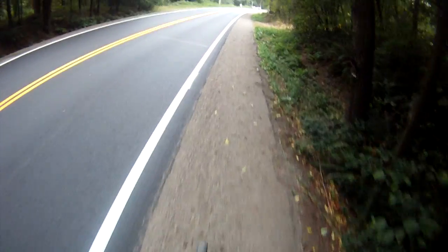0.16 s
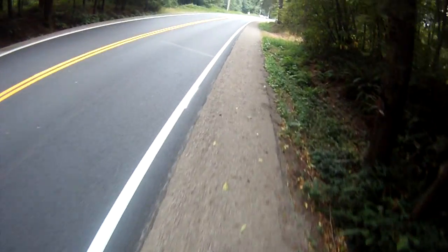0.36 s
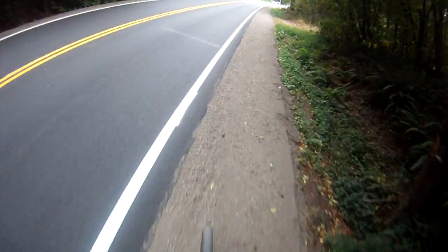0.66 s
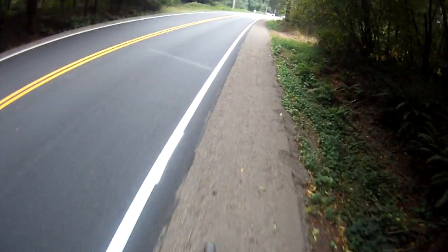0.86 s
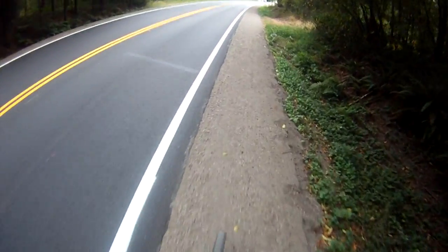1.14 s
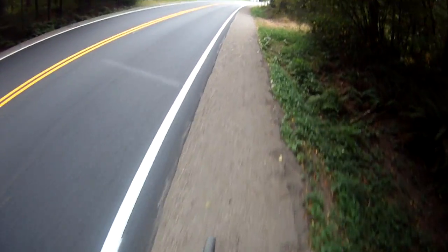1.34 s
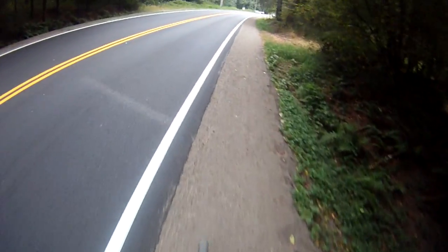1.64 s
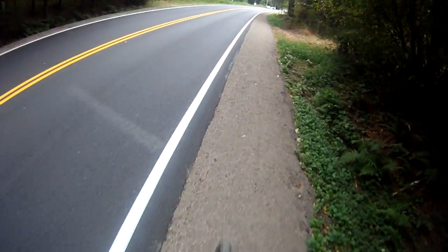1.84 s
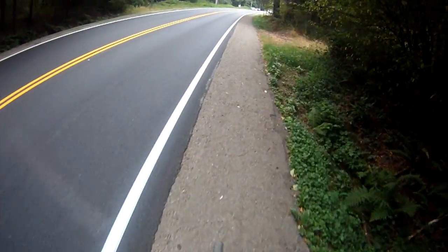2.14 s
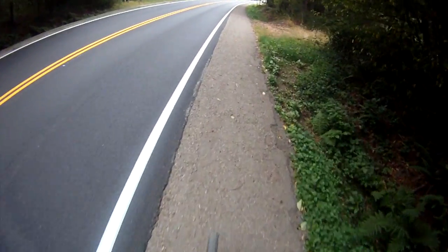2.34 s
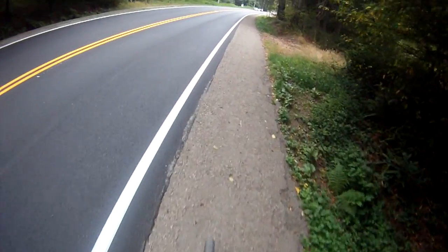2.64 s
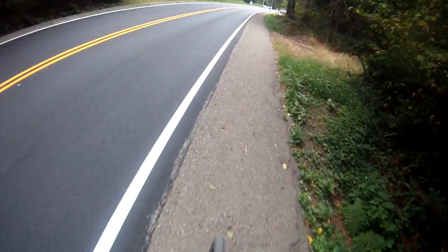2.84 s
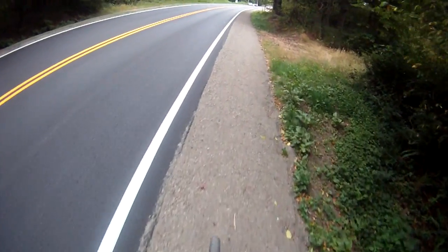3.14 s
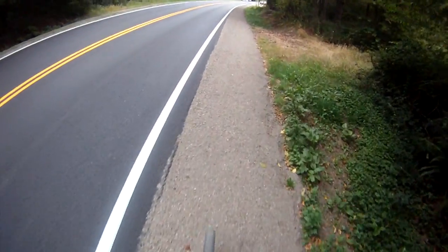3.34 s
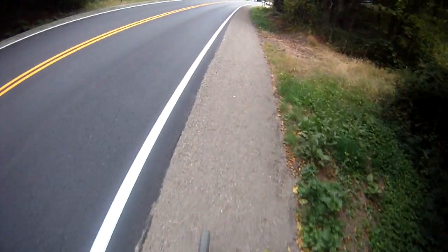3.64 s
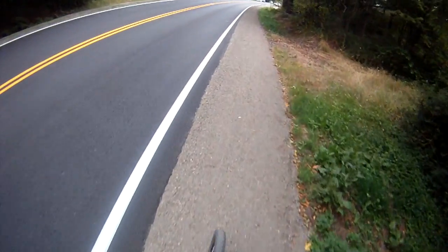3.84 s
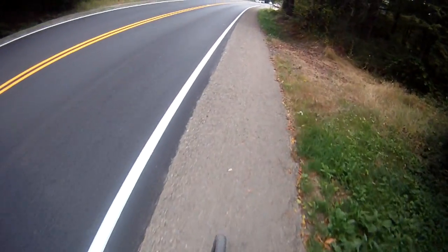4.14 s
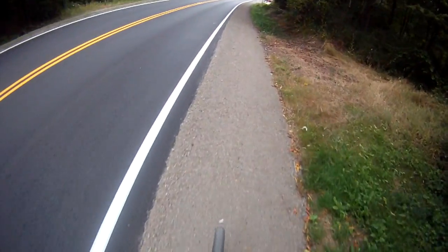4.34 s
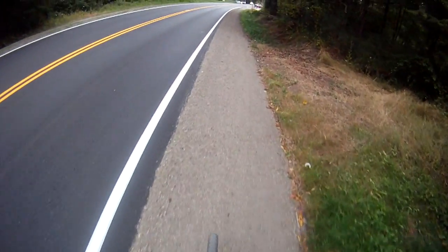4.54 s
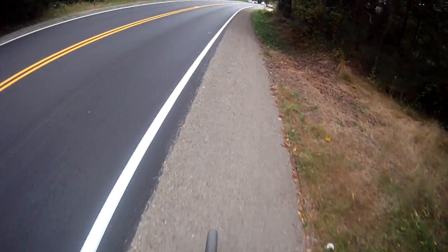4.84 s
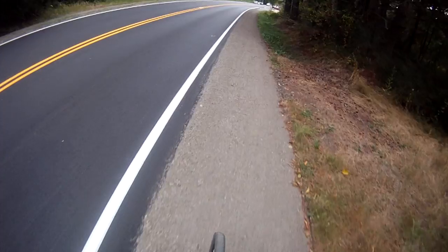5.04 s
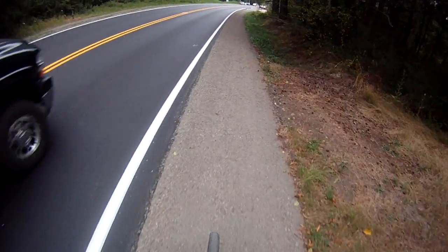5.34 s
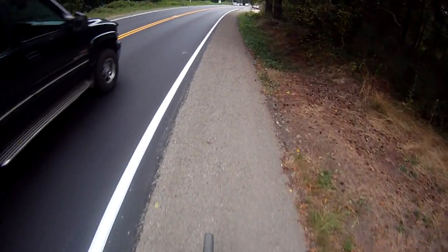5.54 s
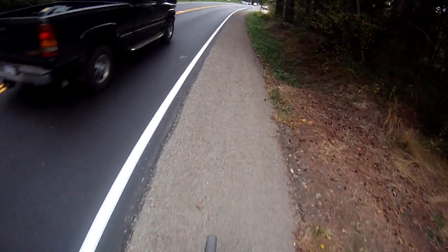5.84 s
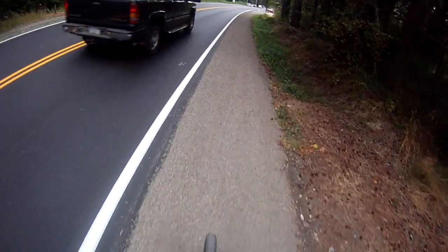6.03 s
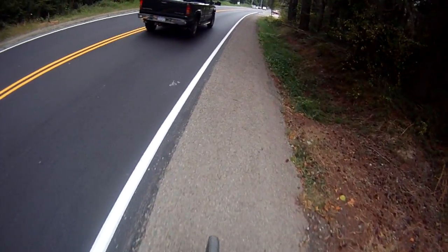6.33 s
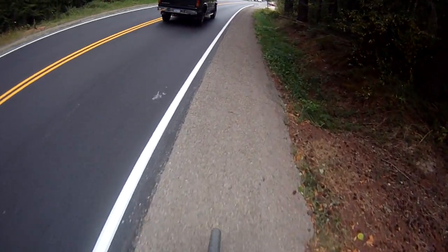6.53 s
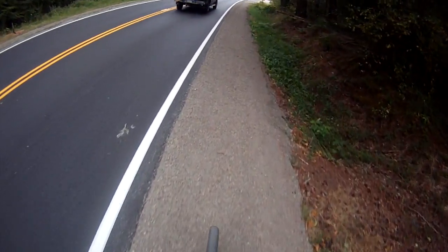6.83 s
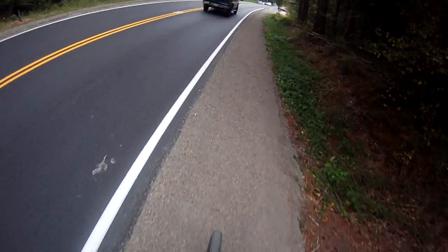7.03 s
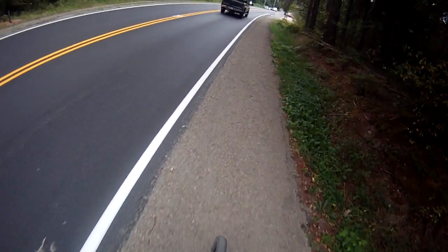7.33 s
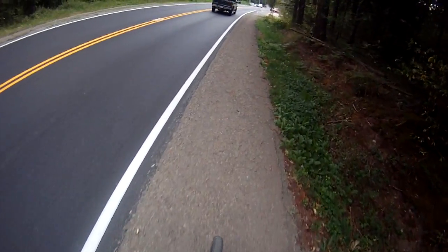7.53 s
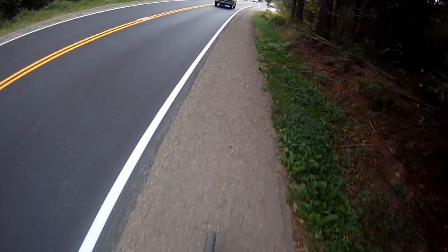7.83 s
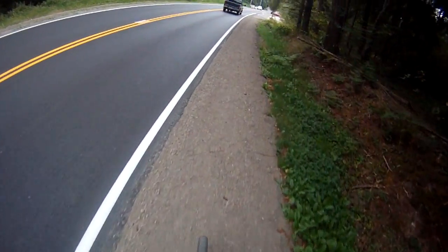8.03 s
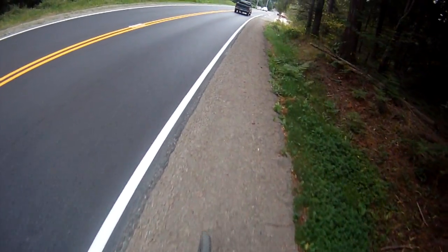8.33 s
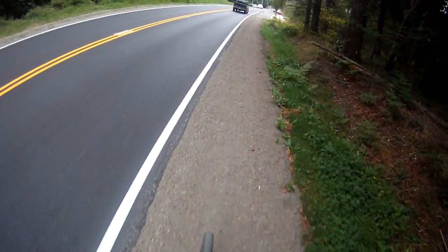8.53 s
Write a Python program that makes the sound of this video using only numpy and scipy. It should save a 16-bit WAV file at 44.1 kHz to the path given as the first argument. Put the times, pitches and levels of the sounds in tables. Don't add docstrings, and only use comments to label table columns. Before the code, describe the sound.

Dull, boxy sound from a bike-mounted camera outdoors: lumpy wind rumble, sparse bright clicks of stones and soft knocks, with a faint rim scrape near the start. After a distant engine dies away, a heavy vehicle approaches and overtakes with a rush of tyres. Its uneven deep drone then stands out and slowly sinks while wind and a few clicks continue.

```python
import sys
import numpy as np
from scipy import signal
from scipy.fft import rfft, irfft, next_fast_len
from scipy.io import wavfile
from scipy.ndimage import uniform_filter1d, map_coordinates

SR = 44100
rng = np.random.default_rng(int(sys.argv[2]) if len(sys.argv) > 2 else 0)


def output_pcm(signal):
    pcm = np.clip(np.atleast_2d(signal).T, -1, 1) * 32767
    wavfile.write(sys.argv[1], SR, np.round(pcm).astype(np.int16))


def convert_level_to_amplitude(level_db):
    exponent = np.asarray(level_db, float) / 20
    return 10 ** exponent


N = 382782
TIME_S = np.arange(N) / SR
USUAL_DB = -40

# start_s, near_db (nearness), grit_db (grit under them)
ROAD = [(0, -44, 3.5), (.2, -45, 0.5), (.37, -40.5, 0), (1, -41, 1), (1.9, -39.5, -1.5), (2.3, -38.5, 0),
        (3.45, -35.5, -4.5), (4.15, -31, 1.5), (4.65, -27, 0), (4.85, -24, -0.5), (5.03, -23, -1),
        (5.2, -24.5, 0.5), (5.36, -28.5, 0.5), (5.8, -39, -1.5), (6.3, -38, -2), (7.15, -36.5, -0.5),
        (7.4, -40, 0.5), (8.68, -45, 2)]


def unit(x):
    return x / np.sqrt(np.mean(x ** 2) + 1e-20)


def curves(rows):
    s, *columns = np.transpose(rows)
    return [np.interp(TIME_S, s, column) for column in columns]


def wobble(rate):
    at = np.arange(0, N + 64, 64)
    knots = rng.standard_normal(int(N * rate / SR) + 4)
    return np.interp(np.arange(N), at, map_coordinates(knots, [at * rate / SR]))


def both(a_db, b_db):
    return 10 * np.log10(convert_level_to_amplitude(2 * a_db) + convert_level_to_amplitude(2 * b_db))


def filtered(x, response):
    m = next_fast_len(N + SR // 2)
    return irfft(rfft(x, m) * response(np.fft.rfftfreq(m, 1 / SR)), m)[:N]


def coloured(x, spectrum):
    f, db = np.transpose(spectrum)
    return filtered(x, lambda hz: convert_level_to_amplitude(np.interp(np.log(hz + 1), np.log(f + 1), db)))


def rush(spectrum, patchy_db, grit):
    z = signal.stft(rng.standard_normal(N), nperseg=512)[2]
    field = uniform_filter1d(rng.standard_normal(z.shape), size=5, axis=0)
    field = uniform_filter1d(field, size=10, axis=1)
    bed = signal.istft(z * convert_level_to_amplitude(patchy_db * unit(field)), nperseg=512)[1][:N]
    stones = (rng.random(N) < 400 / SR) * rng.standard_normal(N)
    return unit(coloured(unit(bed) + grit * unit(stones), spectrum))


def taps(events, t60, crack, partner):
    out, t = np.zeros(N + SR), np.arange(SR // 10) / SR
    for s, db, hz in events:
        ring = np.sin(2 * np.pi * hz * t)
        ring += partner * np.sin(2 * np.pi * 1.27 * hz * t)
        ring += crack * rng.standard_normal(len(t))
        onset = 1 - np.exp(-t / 0.00047)
        out[round(s * SR):][:len(t)] += convert_level_to_amplitude(db - 60 * t / t60) * onset * ring
    return out[:N]


def thumps(events, turns):
    out = np.zeros(N + SR)
    for s, db, hz in events:
        t = np.arange(int(turns / hz * SR)) / SR
        swell = np.sin(np.pi * t * hz / turns) ** 2
        out[round(s * SR) - len(t) // 2:][:len(t)] += convert_level_to_amplitude(db - 5.5) * swell * np.sin(2 * np.pi * hz * t)
    return out[:N]


def ahead():
    overtake_s, takes_s = 5.23, 0.35
    return np.clip((TIME_S - overtake_s) / takes_s, 0, 1)


def far_engine():
    # start_s, pitch_hz, level_db
    far_note = [(0, 117.8, -38), (.35, 112.2, -42.5), (.8, 109.4, -40), (1.3, 103.8, -48),
                (1.6, 104.5, -44)]
    pitch_hz, level_db = curves(far_note)
    gone = np.clip(far_note[-1][0] + 0.35 - TIME_S, 0, 0.3) / 0.28
    return gone * convert_level_to_amplitude(level_db + 1.1 * wobble(5.6)) * np.sin(2 * np.pi * np.cumsum(pitch_hz) / SR)


def wind():
    # start_s, level_db
    airflow = [(0, -41), (.15, -36), (.45, -47.5), (.62, -41), (.88, -39), (1.1, -43.5), (1.6, -43),
               (2.3, -35.5), (2.6, -39.5), (3, -34.5), (3.5, -37), (3.7, -42), (4.9, -38), (5.25, -32.5),
               (6.9, -44.5), (7.6, -35.5), (8.25, -37), (8.68, -43)]
    # pitch_hz, level_db (dB per Hz)
    buffet_colour = [(8.8, -35), (15, -1), (54, -1), (102, -1), (134, -19), (188, -10.5), (220, -10),
                     (290, -16.5), (480, -120)]
    # peak_s, peak_db, pitch_hz
    gusts = [(0.118, -31, 74.0), (0.21, -22, 90), (0.666, -21, 68.8), (0.754, -18.5, 94.3),
             (0.854, -21, 62.9), (1.361, -23, 76.6), (1.443, -20.5, 71.0), (1.618, -26, 58.6),
             (1.759, -21.5, 67.6), (1.925, -25, 75.2), (2.181, -23, 79.0), (2.246, -32, 75.0),
             (2.323, -19, 78.0), (2.408, -18, 72.0), (2.485, -27, 96.8), (2.644, -41, 73.0),
             (2.782, -22, 87.2), (2.883, -16, 89.0), (2.992, -24, 75.9), (3.141, -28, 75.6),
             (3.239, -29, 69.0), (3.371, -36, 68.0), (3.5, -24, 98.0), (4.706, -22, 52.9),
             (6.214, -28, 55.2), (7.372, -16, 65.6), (7.829, -32, 55.3), (7.889, -24.1, 52.0),
             (8.086, -16, 47.0)]
    gust_db = curves(airflow)[0] + wobble(8)
    bed = convert_level_to_amplitude(gust_db + 2.5 + 0.46 * wobble(16)) * rush(buffet_colour, patchy_db=-0.6, grit=0.26)
    return bed + thumps(gusts, turns=2.7)


def stone_clicks():
    # start_s, peak_db, pitch_hz
    stones = [(0.14, -35, 2500), (0.6794, -39.5, 2830), (0.9692, -28, 2800), (1.1942, -31, 2830),
              (1.2401, -30, 2700), (1.5934, -22.5, 2110), (2.1984, -28, 3020), (3.2136, -29, 3000),
              (3.465, -33, 2930), (6.9894, -26, 2900), (7.7203, -32.5, 2700), (7.8306, -31, 2780),
              (7.8685, -28, 2873), (8.09, -28, 2940), (8.321, -31, 2742)]
    housing = [(600, -9), (1800, 6.5), (3200, 3.0), (3700, -9), (5200, -11), (6000, -35)]  # Hz, dB
    return coloured(taps(stones, t60=0.011, crack=1.2, partner=0.8), housing)


def mount_knocks():
    # start_s, peak_db, pitch_hz
    bumps = [(0.303, -38, 463), (0.33, -26, 443), (.79, -26, 384), (.5, -26.5, 484), (1.647, -25.5, 367),
             (3.13, -34.5, 366.5), (7.939, -22, 310)]
    return taps(bumps, t60=0.05, crack=0, partner=0.3)


def scrape():
    start_s, attack_s, hold_s, release_s = 0.27, 0.04, 0.2, 0.15
    squeal_hz, rise_hz, peak_s = 1375, 45.1, 0.46
    edges_s = start_s + np.cumsum([0, attack_s, hold_s, release_s])
    press = np.interp(TIME_S, edges_s, [0, 1, 1, 0])
    modes = [(1420, 130, -3.5), (1270, 72, -3), (2070, 160, -2)]

    def rim(f):
        ringing = sum(convert_level_to_amplitude(db) * 1j * f * w / (c * c - f * f + 1j * f * w) for c, w, db in modes)
        return ringing / (1 + (f / 2600) ** 6)

    rub = convert_level_to_amplitude(2.1 * wobble(53.5)) * unit(filtered(rng.standard_normal(N), rim))
    pitch_hz = squeal_hz + rise_hz * np.exp(-((TIME_S - peak_s) / 0.069) ** 2) + 20 * wobble(30.1)
    squeal = convert_level_to_amplitude(1 + 1.6 * wobble(39)) * np.sin(2 * np.pi * np.cumsum(pitch_hz) / SR)
    return convert_level_to_amplitude(-46) * press * (rub + squeal)


def alongside():
    # pitch_hz, level_db (dB per Hz)
    arch_colour = [(250, -42), (420, -5), (560, 2.5), (680, -2.5), (900, -39)]
    spray_colour = [(3000, -41), (3650, -1), (4300, 2.0), (5000, -5), (6000, -8)]  # Hz, dB per Hz
    spray_s, rise_s, fall_s = 5.04, 0.29, 0.3
    late = TIME_S - spray_s
    passing = np.exp(-np.abs(late) / np.where(late < 0, rise_s, fall_s))
    spray = convert_level_to_amplitude(-33) * passing * rush(spray_colour, patchy_db=-3.0, grit=0.1)
    arch_pass = np.exp(-((late - 0.12) / 0.46) ** 2)
    return spray + convert_level_to_amplitude(-32) * arch_pass * rush(arch_colour, patchy_db=0.8, grit=0.24)


def tyres():
    # peak_s, surge_db, half_length_s
    seams = [(5.191, 5, .012), (5.237, 3.5, 0.01), (6.238, 3, 0.037), (6.797, 1.5, 0.096),
             (7.467, 2, 0.026)]
    # offset_db, growth (dB per dB), ahead_db (change once in front)
    layers = [
        (0.5, 0.79, 3.5),
        (-2, 1, 0.5),
        (-3.5, 0.96, -1.5),
        (-17.5, 0.91, -1),
    ]
    # start_s, share (shaded roar, 0-1)
    in_front = [(5.3, 0), (5.6, 0.99), (6.9, 0.94), (7.4, 0.2)]
    # pitch_hz, level_db (dB per Hz)
    boom_colour = [(76, -45), (130, -4.5), (152, -4.5), (200, -15), (227, -8.5), (269, -15), (327, -9),
                   (520, -10.5), (900, -22), (1170, -48), (1980, -120)]
    # pitch_hz, level_db (dB per Hz)
    roar_colour = [(410, -10), (700, -4), (756, -4.5), (911, -3), (1100, 3.5), (1250, 1), (1520, 1.5),
                   (2400, -4), (3120, -48), (5280, -120)]
    # pitch_hz, level_db (dB per Hz)
    shaded_colour = [(350, -30), (600, -11.5), (668, -25), (786, -1), (1010, -3), (1100, -1.5), (1370, -2),
                     (1610, -4.5), (1800, -10), (1950, -6), (2190, -4.5), (2290, -7.5), (2470, -39),
                     (2700, -28), (3510, -34), (5940, -120)]
    # pitch_hz, level_db (dB per Hz)
    hiss_colour = [(1290, -39), (2200, -4.5), (2360, -8), (2670, 1.5), (2870, 3.5), (3040, 0), (3570, -15),
                   (3800, -16.5), (4940, -36), (8360, -120)]
    # pitch_hz, level_db (dB per Hz)
    fizz_colour = [(2060, -20), (3500, -3.5), (3750, -9), (4050, -4), (4600, 3.5), (5100, 0), (5300, -3),
                   (5520, -12), (5750, -13.5), (6000, -16)]

    near_db, grit_db = curves(ROAD)
    surge_db = sum(db * np.exp(-((TIME_S - s) / half) ** 2) for s, db, half in seams)
    near_db = near_db - USUAL_DB + surge_db
    boom_db, roar_db, hiss_db, fizz_db = (
        USUAL_DB + db + grows * near_db + ahead_db * ahead() for db, grows, ahead_db in layers)
    rough = 0.17 * wobble(26) + 0.46 * wobble(45)

    boom = convert_level_to_amplitude(boom_db + 0.14 + 0.5 * rough) * rush(boom_colour, patchy_db=0.55, grit=0.15)
    shaded = np.clip(curves(in_front)[0], 0, 1)
    tread = np.sqrt(1 - shaded) * rush(roar_colour, patchy_db=0.5, grit=0.34)
    tread += np.sqrt(shaded) * rush(shaded_colour, patchy_db=1.5, grit=0.53)
    roar = convert_level_to_amplitude(roar_db - 1.1 + 0.27 * rough) * tread
    hiss = convert_level_to_amplitude(hiss_db + grit_db + 0.54 + 1.2 * rough) * rush(hiss_colour, patchy_db=0.93, grit=0.46)
    fizz_db = fizz_db + 0.36 * grit_db + 2.5 + 0.51 * rough
    fizz = convert_level_to_amplitude(fizz_db) * rush(fizz_colour, patchy_db=-1.9, grit=0.41)
    return boom + roar + hiss + fizz + alongside()


def engine():
    # start_s, turns_hz (crankshaft), firing_db (fourth order)
    revs = [(1.2, 25.96, -54), (1.7, 25.15, -43), (2.3, 24.53, -52), (2.85, 24.06, -40), (3.3, 22.9, -42),
            (3.68, 23.66, -43), (4.05, 24.17, -32), (4.42, 23.91, -33.5), (4.7, 24.25, -23),
            (5.07, 25.05, -14.5), (5.5, 26.14, -12.5), (5.74, 26.07, -12.5), (6.01, 25.58, -13.5),
            (6.6, 25.29, -13), (7.03, 25.03, -17), (7.8, 24.83, -19), (8.15, 24.43, -22.5),
            (8.68, 23.42, -26.5)]
    weak_orders = [2, 2.5, 3, 3.5, 4.5, 6, 6.5, 7, 8.5, 12.5, 13]
    weak_db = [-10, -13, -14, -19, -5.5, -11.5, -17, -20, -18, -23, -20.5]
    turns_hz, firing_db = curves(revs)
    near_db = curves(ROAD)[0] - USUAL_DB
    angle = 2 * np.pi * np.cumsum(turns_hz) / SR

    def front(db, grows):
        return USUAL_DB + db + grows * near_db - 12 * ahead()

    def order(k, db):
        phase = k * (angle + 0.057 * wobble(7.1)) + 6.87 * rng.random()
        return convert_level_to_amplitude(db + 2.0 + 0.46 * wobble(14)) * np.sin(phase)

    fifth_db = both(front(-7.5, grows=1.43), firing_db - 13.5) + 0.76 * wobble(7)
    eighth_db = both(front(-3, grows=0.9), firing_db - 22.5) + 2.07 * wobble(6)
    drone = order(4, firing_db) + order(5, fifth_db) + order(8, eighth_db)
    opens_s, takes_s = 6.01, 0.97
    drone += np.clip((TIME_S - opens_s) / takes_s, 0, 1) * order(7, firing_db - 19)
    for k, db in zip(weak_orders, weak_db):
        drone += order(k, fifth_db + db + 2.1 * wobble(2.54))
    fade_in = np.clip(TIME_S - revs[0][0], 0, 0.3) / 0.36
    return drone * fade_in


def scene():
    bicycle = stone_clicks() + mount_knocks() + scrape()
    return (far_engine() + wind() + bicycle + tyres() + engine())[None]


def low_pass(x):
    return signal.sosfilt(signal.butter(12, 16480, fs=SR, output="sos"), x)


def record(dry):
    clock_hz, held, top_hz = 12000, 4, 15270
    slow = filtered(dry[0], lambda hz: hz < clock_hz / 2)
    mirrored = slow * (1 + 2 * np.cos(2 * np.pi * clock_hz * TIME_S))

    def hold(hz):
        return np.sinc(hz / clock_hz) / np.sinc(hz / clock_hz / held) * (hz < top_hz)

    return low_pass(filtered(mirrored, hold)[None])


dry = scene()
out = record(dry)
output_pcm(out)
```